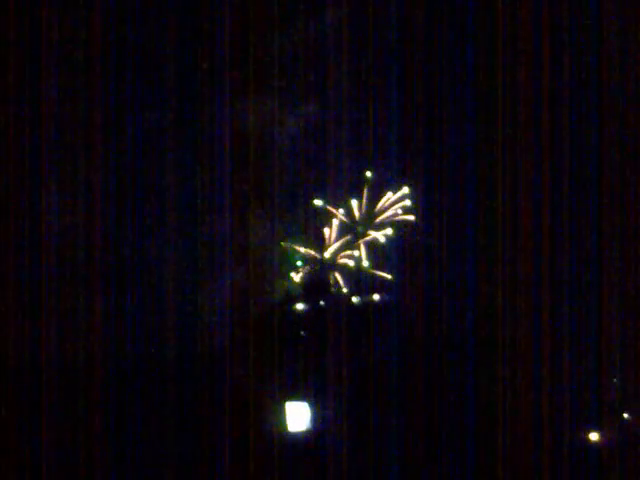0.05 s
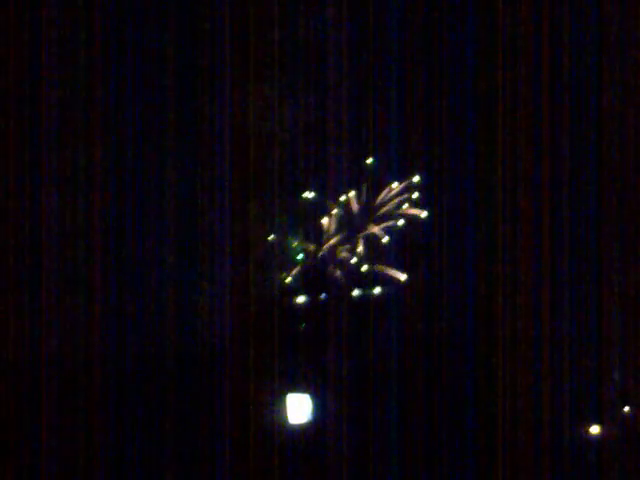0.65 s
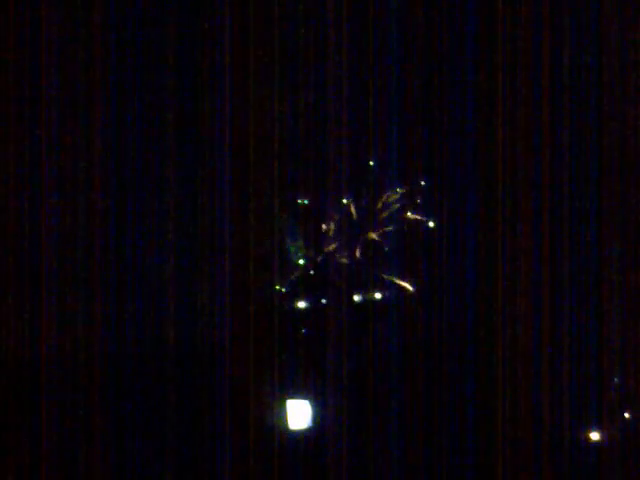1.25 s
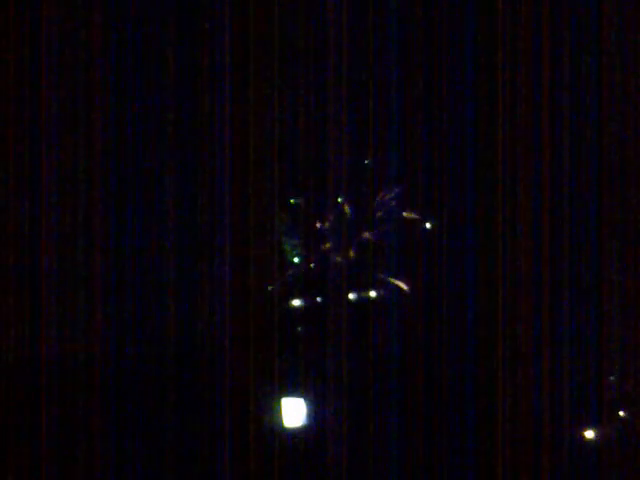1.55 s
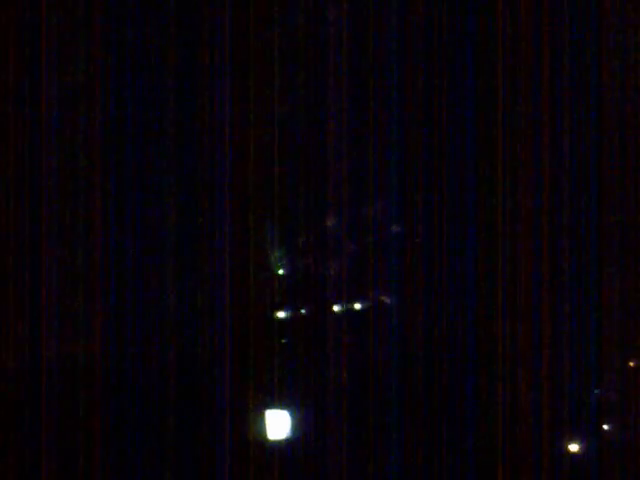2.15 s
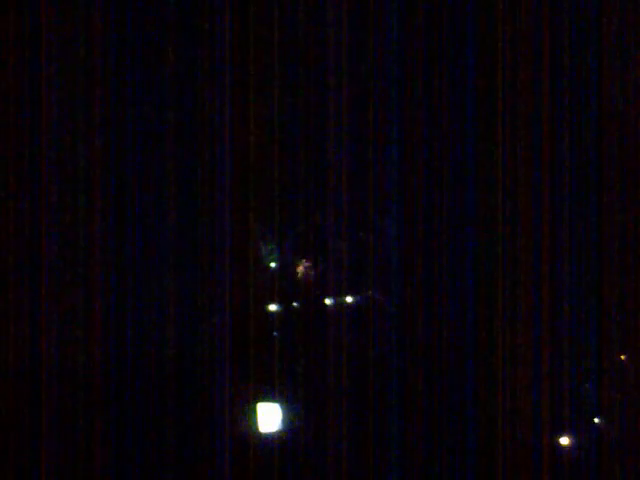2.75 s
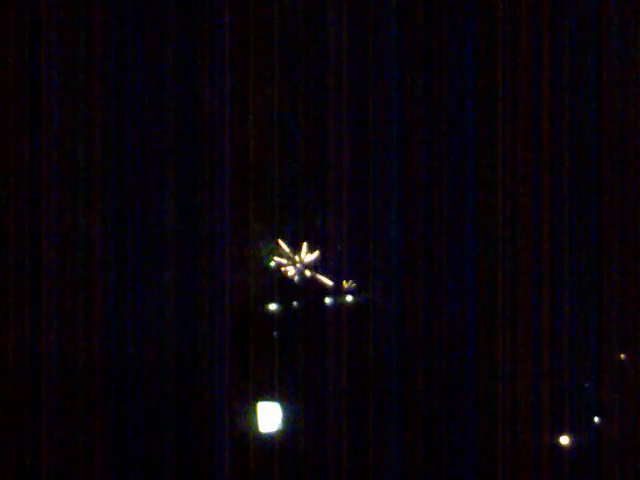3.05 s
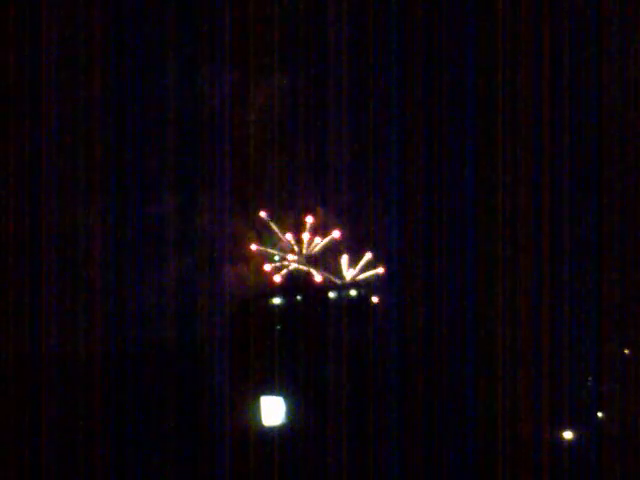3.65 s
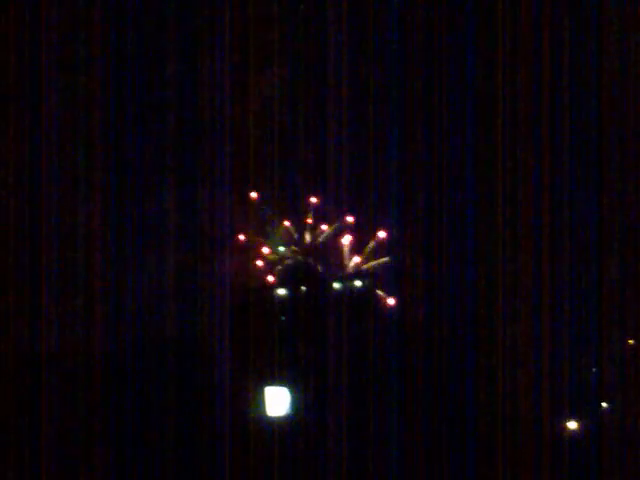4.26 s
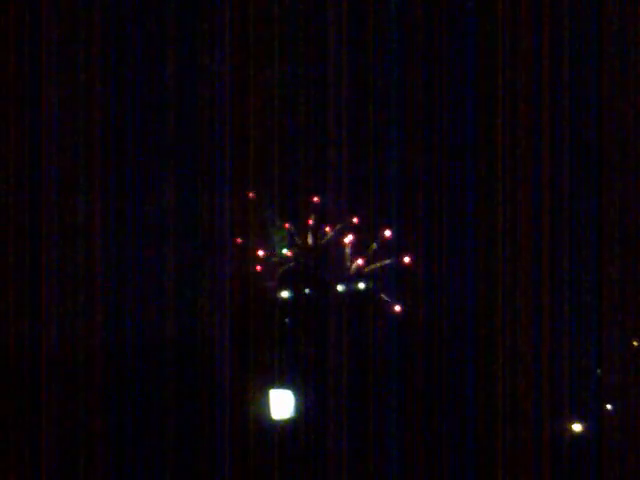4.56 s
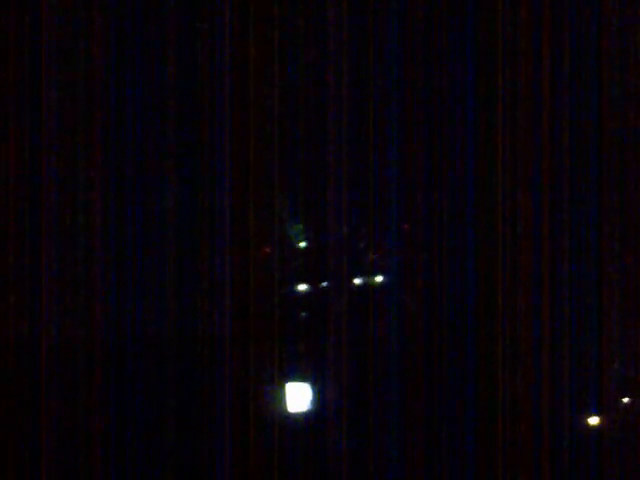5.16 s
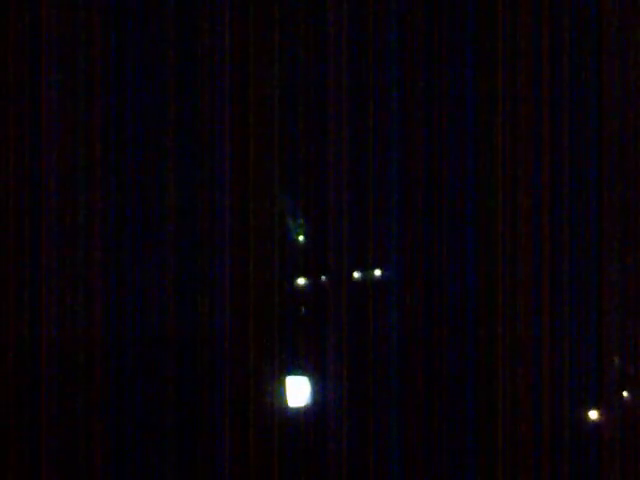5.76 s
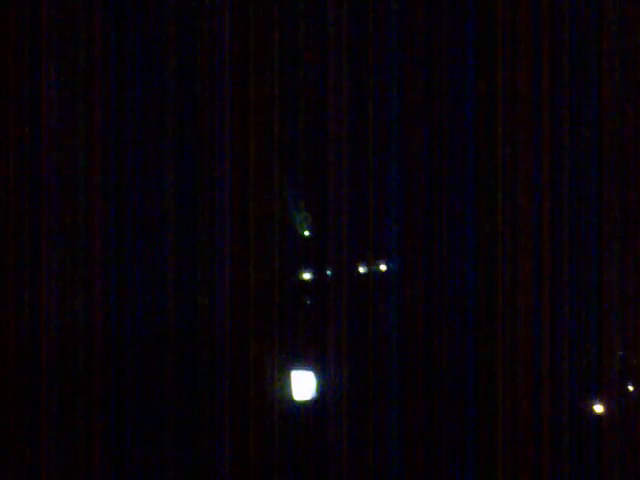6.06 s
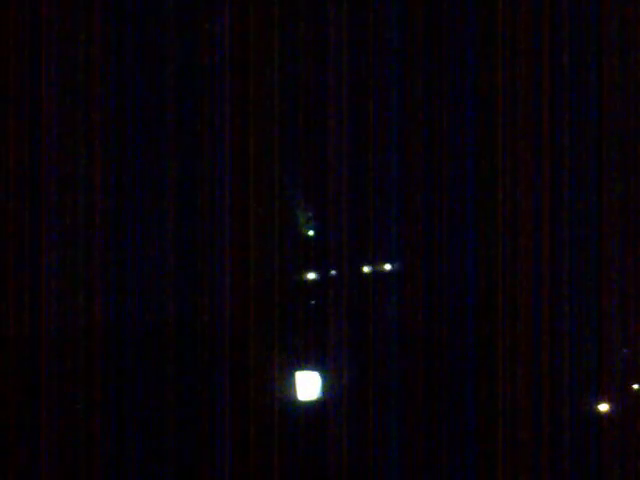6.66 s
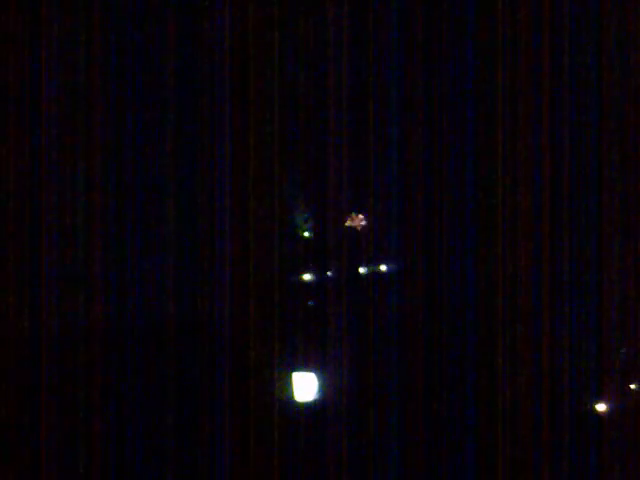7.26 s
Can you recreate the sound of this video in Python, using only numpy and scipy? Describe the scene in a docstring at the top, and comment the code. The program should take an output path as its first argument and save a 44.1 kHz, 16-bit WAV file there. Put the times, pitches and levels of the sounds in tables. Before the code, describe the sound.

Over the low rumble of a town at night, distant firework shells go off in bass-heavy clusters. First come a soft pop and several thumps, then deep booms with long, dark echoes. After a quieter stretch of far volleys and brief, faint fizzing, a dense run of thuds and bangs builds to the strongest booms. The sound is muffled and mono, from a small microphone that distorts slightly and dips in level at the peaks.

```python
"""Firework shells burst over a city at night, heard from far off through a small mono microphone.
Over the town's rumble a faint pop leads to a cluster near 1 s and heavy booms just after 2 s. Each is a
pressure pulse and a train of echoes off the buildings, which then rolls away across town. Quieter shells,
fizzes and far volleys fill the lull. From 5 s bursts and dull thuds crowd in, peaking just after 6 s.
The loudest booms overload the input, which turns itself down."""
import sys
import numpy as np
from scipy import signal
from scipy.fft import rfft, irfft
from scipy.io import wavfile

SR = 44100
rng = np.random.default_rng(int(sys.argv[2]) if len(sys.argv) > 2 else 0)


def waveform_to_disk(signal):
    """Save audio, clipped to [-1, 1], as 16-bit WAV at the path in sys.argv[1]."""
    frames = np.transpose(np.atleast_2d(signal))
    scaled = np.clip(frames, -1, 1) * 32767
    samples = np.round(scaled).astype(np.int16)
    wavfile.write(sys.argv[1], SR, samples)


N = 321930


def undb(db):
    """Decibels to amplitude."""
    return 10 ** (np.asarray(db) / 20)


def add(out, start_s, sound):
    """Mix a sound in from start_s on."""
    i = int(np.clip(start_s * SR, 0, N - 1))
    out[i:i + len(sound)] += sound[:N - i]


def colour(x, curve, bass_db=0, crack_db=0, note_hz=500, note_db=0, note_width=0.09, size=4096):
    """Unit-power EQ: a curve of (Hz, dB) points, a shelf at either end and one resonance."""
    hz = np.maximum(np.arange(size // 2 + 1) * SR / size, 1)
    curve_hz, curve_db = np.transpose(curve)
    db = np.interp(np.log(hz), np.log(curve_hz), curve_db)
    db += bass_db / (1 + (hz / 170) ** 4) + crack_db / (1 + (520 / hz) ** 4)
    db += note_db / (1 + (np.log(hz / note_hz) / note_width) ** 2)
    cepstrum = irfft(np.log(undb(db)))
    cepstrum[1:size // 2] *= 2  # fold to minimum phase, so nothing rings ahead of a hit
    cepstrum[size // 2 + 1:] = 0
    response = irfft(np.exp(rfft(cepstrum)))
    return signal.oaconvolve(x, response / np.linalg.norm(response))[:len(x)]


def wobble(rate_hz, count):
    """A random drift with a spread near 1."""
    return 1.2 * np.interp(np.arange(count) * rate_hz / SR, np.arange(1024), rng.standard_normal(1024))


def fade(t, t60):
    """Hold until time zero, then fall 60 dB in t60 seconds."""
    return np.exp(-np.log(1000) * np.maximum(t, 0) / t60)


def lag(x, seconds):
    """Follow x slowly, with this time constant."""
    keep = np.exp(-1 / (seconds * SR))
    return signal.lfilter([1 - keep], [1, -keep], x)


# The bass-heavy tone of a distant blast. Each row: frequency in Hz, level in dB.
BLAST_EQ = [(18, -20.5), (45, -1.5), (88, 3), (135, 0), (205, 1.5), (280, -1.5), (385, -9.5), (480, -7.5),
            (620, -11), (1100, -16), (2000, -21.5), (3600, -34), (6000, -53.5), (15000, -64)]
# The shell cues. Each row: start in seconds, level in dB, bass in dB, crack in dB,
# seconds the echoes stay dense, hollow note of the echo path in Hz.
SHELL_CUES = [ (0.000, -36, 1, 3, 0.068, 443), (0.532, -43, -26, -5, 0.14, 420),
              (0.866, -17.5, 5.5, -3.5, 0.062, 450), (0.932, -19.5, -2.5, 1.5, 0.11, 168),
              (1.040, -22, -15, -2.5, 0.091, 750), (1.192, -33.5, 3, 24, 0.069, 1950),
              (1.309, -20, -10.5, -0.5, 0.034, 240), (1.357, -23.5, -14.5, -5.5, 0.009, 514),
              (1.738, -37, -13, 6, 0.024, 216), (1.874, -39, -12, 5, 0.003, 790),
              (2.0931, -6, 2.5, 0.5, 0.034, 1080), (2.229, -8, -1.5, 0.5, 0.004, 250),
              (2.277, -11.5, -8, -5.5, 0.0069, 287), (2.918, -29.5, -2, 9.5, 0.012, 816),
              (2.930, -25.5, 1.5, 4.5, 0.03, 790), (3.654, -27.5, 2.5, 0.5, 0.011, 696),
              (3.762, -28, -8, -9.5, 0.13, 470), (4.296, -34.5, -6, -14, 0.0061, 243),
              (4.4, -30, 2.5, -4.5, 0.019, 212), (5.062, -22.5, 11.5, 1, 0.042, 172),
              (5.112, -24.5, 8, 4, 0.1, 312), (5.258, -20, 2, 1.5, 0.2, 170),
              (5.511, -21.5, 7.5, 8.5, 0.068, 284), (5.868, -20, 7, -0.5, 0.027, 306),
              (6.005, -23, 10, 4, 0.019, 204), (6.208, -6.5, 2, 0, 0.05, 1050),
              (6.473, -4.5, 5, 3, 0.021, 207), (6.552, -13, -0.5, -2, 0.011, 713),
              (6.848, -16, 5, -6.5, 0.049, 202), (7.040, -21, 1, -8, 0.074, 70.4),
              (7.212, -16, 9.5, 8, 0.029, 810), (7.248, -12.5, 6.5, 3, 0.0039, 540)]


def shell_bursts(front=3.7, snap_s=0.019, snap_loss_db_per_s=61, note_blur_s=0.062):
    """Each shell sends a sharp front and its echoes; the city's surfaces and the air dull them."""
    out, t = np.zeros(N), np.arange(int(1.3 * SR)) / SR
    for start_s, db, bass_db, crack_db, dense_s, note_hz in SHELL_CUES:
        train = wall_echoes(t) * fade(t - dense_s, t60=0.78)
        train[0] -= front
        # the longer the echoes crowd, the less the first snap and the hollow note stand out
        snap_db = 5 - snap_loss_db_per_s * dense_s
        note_db = 10.5 * np.exp(-dense_s / note_blur_s)
        train *= undb(snap_db * np.exp(-(t / snap_s) ** 2))
        blast = colour(train, BLAST_EQ, bass_db, crack_db, note_hz, note_db, note_width=0.083)
        add(out, start_s, undb(db) * blast)
    return out


def wall_echoes(t, first_per_s=900, thicken_s=0.07, diffuse=0.53, patchy_db=1.0):
    """Reflections off walls and roofs: separate at first, crowding together as the wave spreads."""
    chance = np.minimum(first_per_s * (1 + (t / thicken_s) ** 2) / SR, 1)
    arrivals = rng.random(len(t)) < chance
    slaps = arrivals * np.sign(rng.standard_normal(len(t))) / np.sqrt(chance)
    wash = diffuse * rng.standard_normal(len(t))
    return (slaps + wash) / np.hypot(1, diffuse) * undb(patchy_db * wobble(156, len(t)))


# The dull low thumps. Each row: start in seconds, level in dB, pitch in Hz.
THUD_CUES = [ (0.097, -16, 100), (0.284, -26, 62), (0.945, -0.5, 131), (0.969, -5, 110), (1.066, 2.5, 240),
             (2.276, -1, 239), (4.396, -22.5, 69), (4.756, -27, 97.6), (5.258, -5.5, 68), (5.278, -1, 93),
             (5.519, 1, 95.6), (5.523, 5, 331), (5.87, -7, 74.4), (5.88, -2.5, 87), (5.933, -9, 84.6),
             (6.014, -14, 76.5), (6.765, -8, 65.3), (6.869, -3, 66.4)]


def thuds(rise_s=0.0012, ring_cycles=5.6):
    """Each thud is a pressure swing that dies within a few cycles."""
    out, t = np.zeros(N), np.arange(SR // 4) / SR
    for start_s, db, hz in THUD_CUES:
        envelope = (1 - np.exp(-t / rise_s)) * fade(t, t60=ring_cycles / hz)
        add(out, start_s, -undb(db) * np.sin(2 * np.pi * hz * t) * envelope)
    return out


# The dark tone of the tail across town. Each row: frequency in Hz, level in dB.
ROLL_EQ = [(25, -24), (80, -25), (150, -5.5), (230, -10), (310, -16), (390, -7), (500, -2.5), (1000, -15),
           (2000, -15), (3500, -40), (6000, -62), (15000, -65)]


def town_roll(booms, t60=1.27, build_s=0.072, wet_db=-31):
    """Far districts return the booms late, as a long low murmur."""
    t = np.arange(2 * SR) / SR
    tail = colour(rng.standard_normal(len(t)), ROLL_EQ) * fade(t, t60) * (1 - np.exp(-t / build_s))
    return undb(wet_db) * signal.fftconvolve(booms, tail / np.linalg.norm(tail))[:N]


# The bright tone of a fizz. Each row: frequency in Hz, level in dB.
FIZZ_EQ = [(500, -56), (2800, 2), (4200, 7), (6000, -0.5), (9000, -5), (15000, -15.5)]
# The fizz cues. Each row: start in seconds, level in dB.
FIZZ_CUES = [ (0.822, -45), (0.867, -43), (1.427, -52), (1.673, -55.5), (1.824, -54.5), (3.214, -55),
             (3.513, -55), (3.901, -49.5), (4.194, -52), (5.677, -39.5), (5.748, -43.5), (6.014, -49.5),
             (6.553, -41), (7.175, -37.5), (7.251, -49)]


def fizzes(grain_db=3, rise_s=0.0031):
    """Brief grainy spits of treble."""
    out, t = np.zeros(N), np.arange(SR // 2) / SR
    envelope = (1 - np.exp(-(t / rise_s) ** 2)) * fade(t, t60=0.3)
    for start_s, db in FIZZ_CUES:
        grains = rng.standard_normal(len(t)) * undb(grain_db * wobble(600, len(t)))
        add(out, start_s, undb(db) * grains * envelope)
    return colour(out, FIZZ_EQ)


# The low bed of the town and the thin air above it. Each row: frequency in Hz, level in dB.
RUMBLE_EQ = [(20, -10), (50, -2), (90, 1), (160, -3), (220, 1.5), (360, -6), (700, -12), (1800, -19),
             (3300, -34), (6000, -53), (15000, -60)]
HISS_EQ = [(500, 5.5), (2600, 8.5), (3900, 5), (5200, -0.5), (8000, -5), (13000, -8.5)]
# Far volleys, each blurred into one hissing rumble.
# Each row: start in seconds, length in seconds, rumble in dB, hiss in dB.
VOLLEY_CUES = [ (0.845, 0.14, -26.5, -41), (1.305, 0.11, -39, -48), (3.0, 0.87, -38.5, -67.5),
               (3.65, 0.66, -38.5, -56), (5.042, 0.59, -28, -47), (6.59, 0.75, -32.5, -53)]


def night_bed(booms, town_db=-45, air_db=-57, linger_db=-30.5, flutter_db=0.8, flicker_db=1.0):
    """The town's uneven rumble and a thin hiss; volleys swell both, and the rumble lingers after booms."""
    linger = lag(np.tanh(booms / 0.13) ** 2, seconds=0.69)  # levels off for the bigger booms
    rumble_power = undb(town_db) ** 2 + undb(linger_db) ** 2 * linger
    hiss_power = undb(air_db) ** 2
    for start_s, length_s, rumble_db, hiss_db in VOLLEY_CUES:
        t = np.maximum(np.arange(N) / SR - start_s, 0)
        rise = 1 - np.exp(-t / 0.035)
        swell = rise * fade(t - length_s, t60=5.7 * length_s)  # a longer volley dies away more slowly
        rumble_power += (undb(rumble_db) * swell) ** 2
        hiss_power += (undb(hiss_db) * swell) ** 2
    rumble = rng.standard_normal(N) * np.sqrt(rumble_power) * undb(flutter_db * wobble(30, N))
    hiss = rng.standard_normal(N) * np.sqrt(hiss_power) * undb(flicker_db * wobble(40, N))
    return colour(rumble, RUMBLE_EQ) + colour(hiss, HISS_EQ)


def scene():
    """The mono mix: booms in front, their roll, the fizzes and the night bed behind."""
    booms = shell_bursts() + thuds()
    return (booms + town_roll(booms) + fizzes() + night_bed(booms))[None]


def record(dry, ceiling=0.74, duck_db=7, attack_s=0.31, release_s=0.47, top_hz=15750):
    """Overload ducks the gain for a second or so; the input flattens the loudest swings; the top is cut."""
    too_loud = 1.0 * (np.abs(dry) > ceiling)
    overload = lag(lag(too_loud, attack_s), release_s)  # recent share of time spent over the ceiling
    ducked = dry * undb(-duck_db * np.tanh(overload / 0.018))
    clipped = ducked / (1 + np.abs(ducked / ceiling) ** 20) ** (1 / 20)
    high_cut = signal.ellip(10, 0.1, 70, top_hz, fs=SR, output="sos")
    return signal.sosfilt(high_cut, clipped)


dry = scene()
out = record(dry)
waveform_to_disk(out)
```